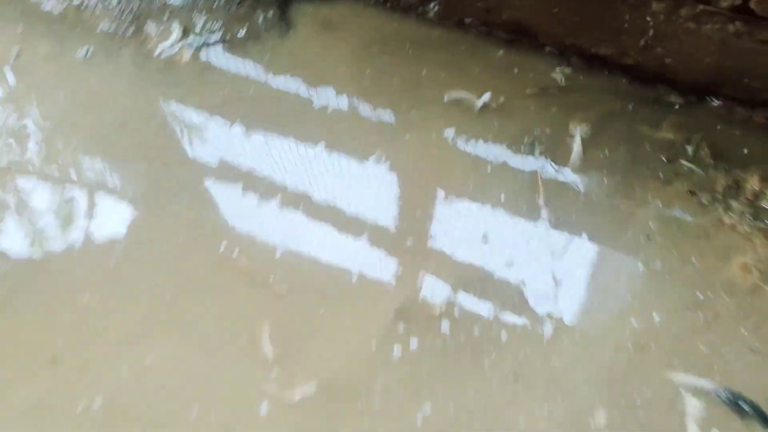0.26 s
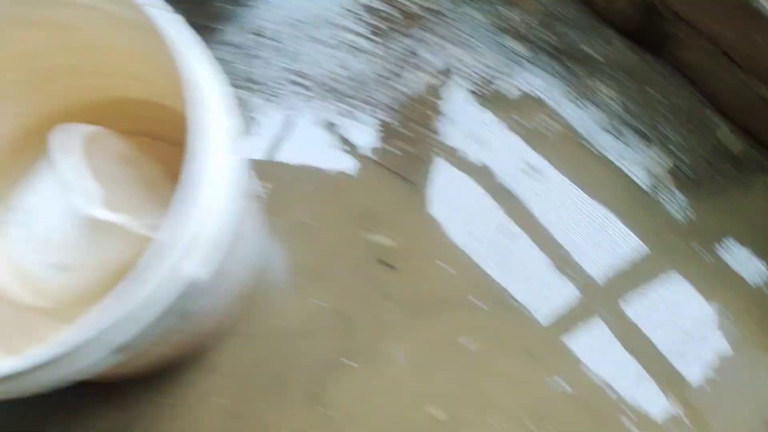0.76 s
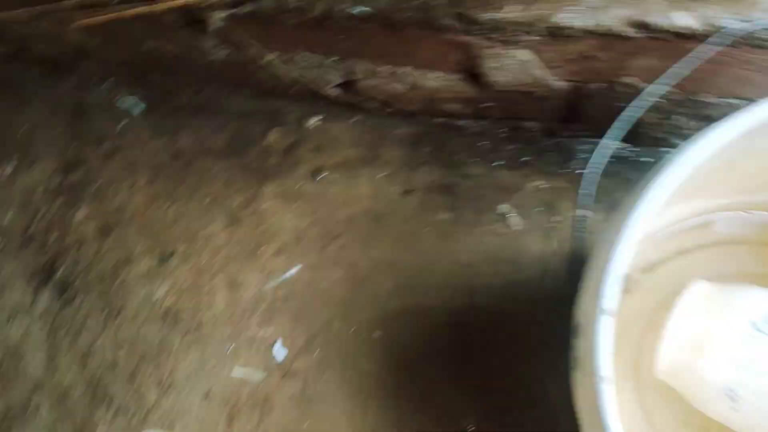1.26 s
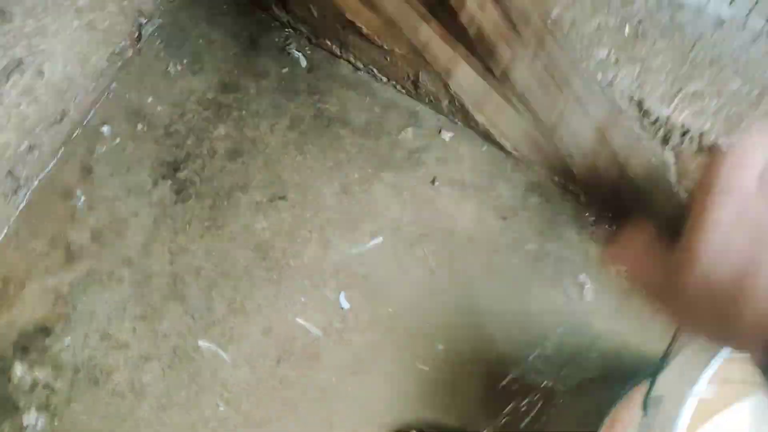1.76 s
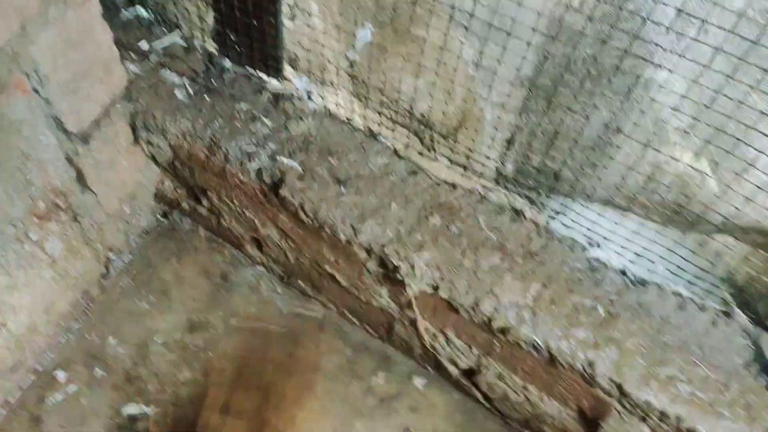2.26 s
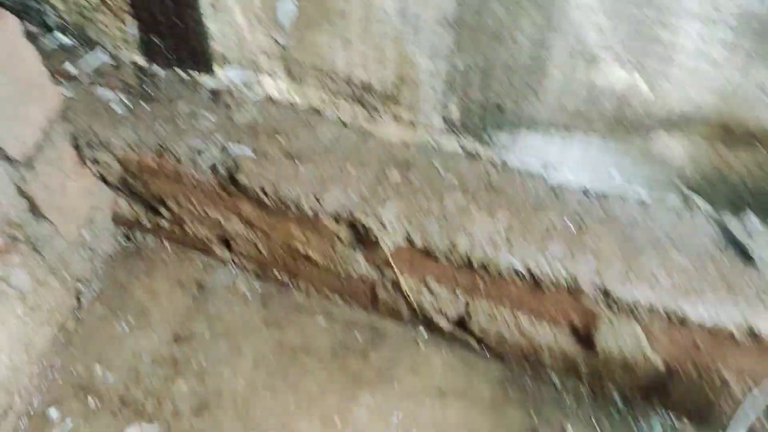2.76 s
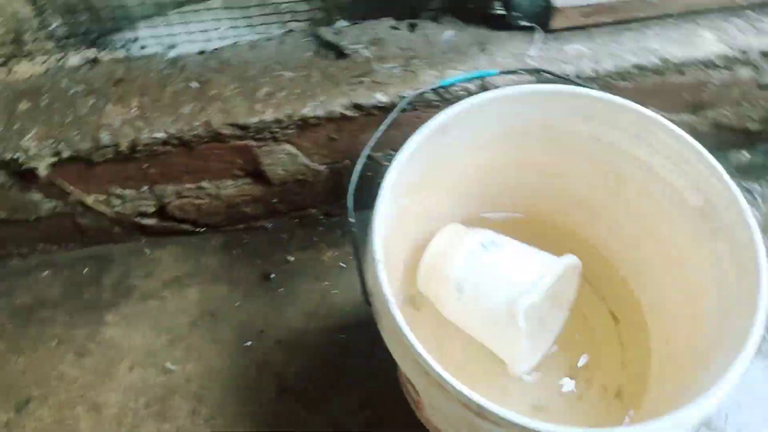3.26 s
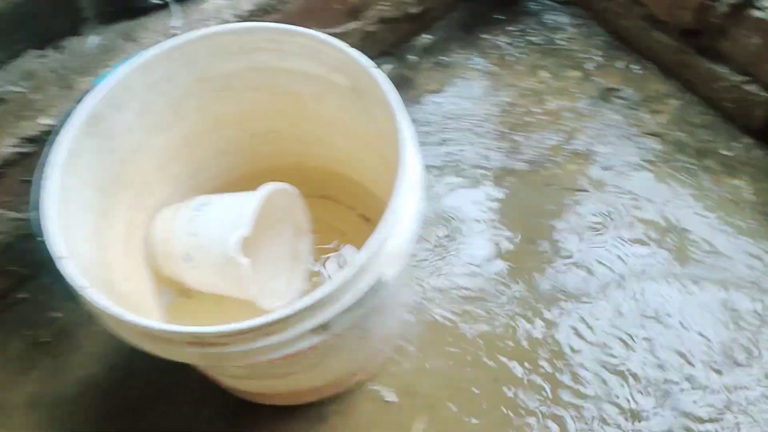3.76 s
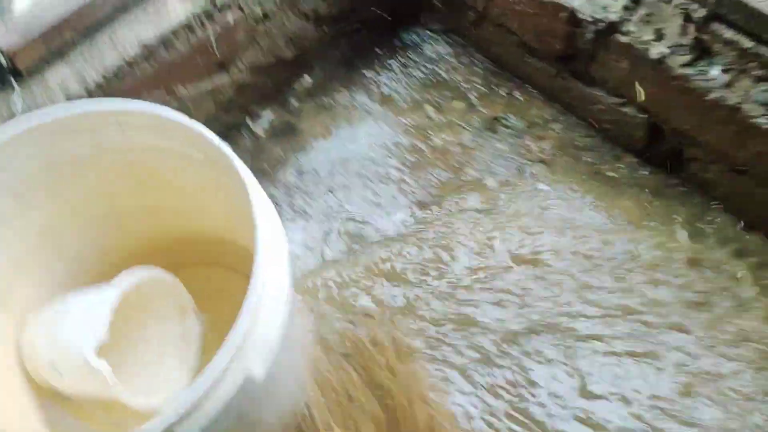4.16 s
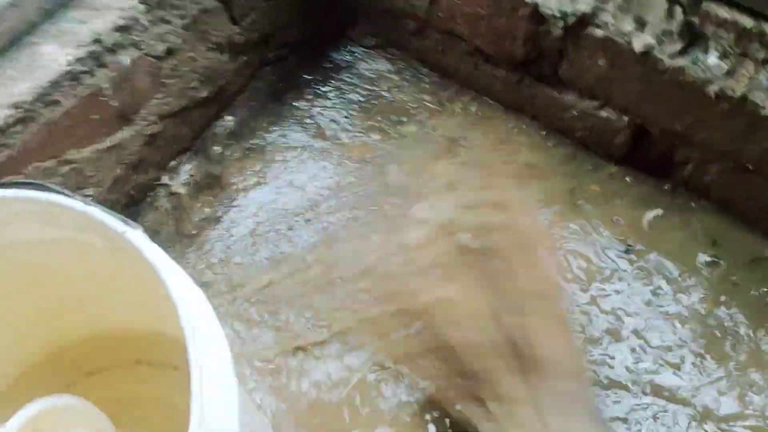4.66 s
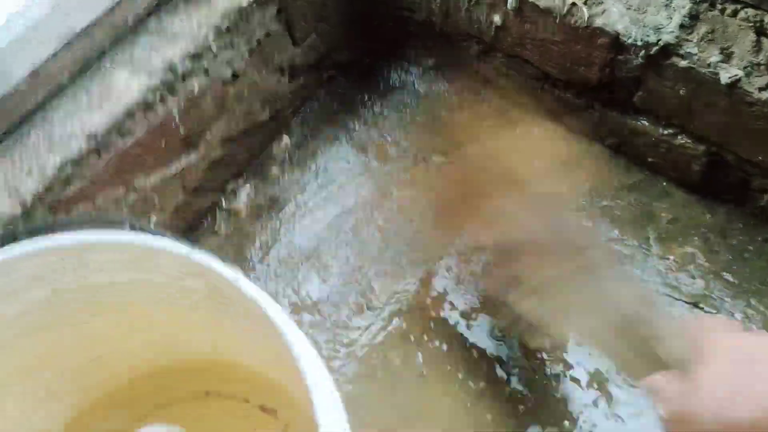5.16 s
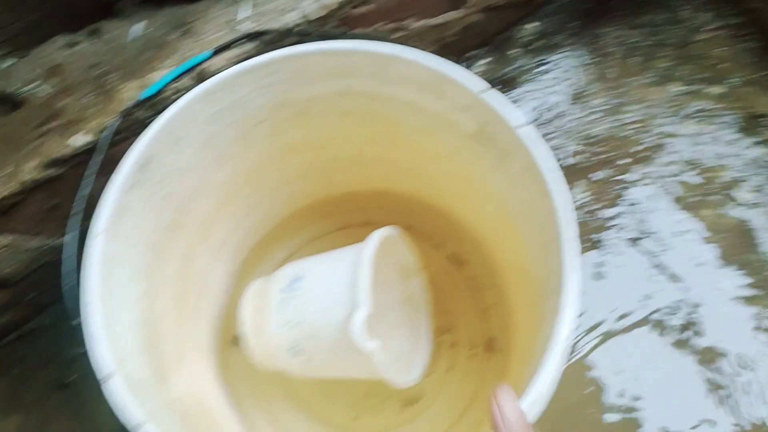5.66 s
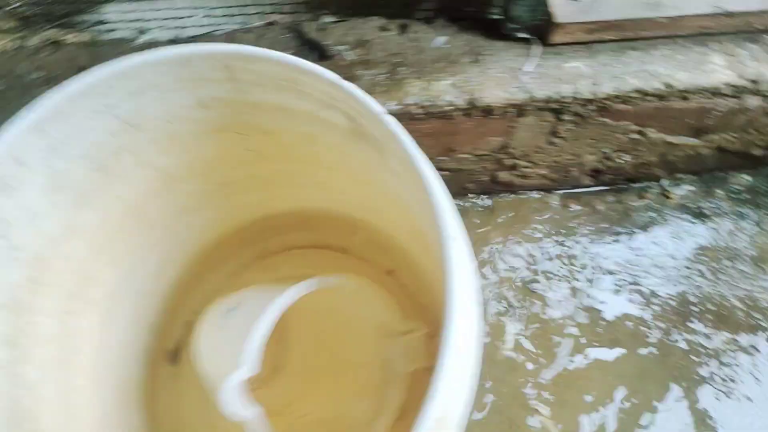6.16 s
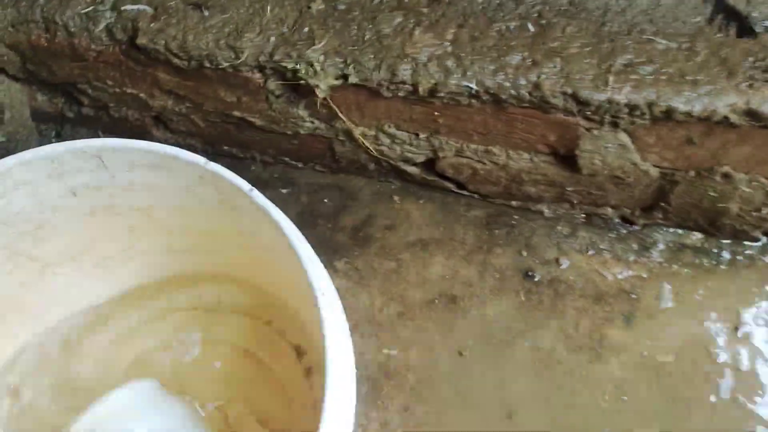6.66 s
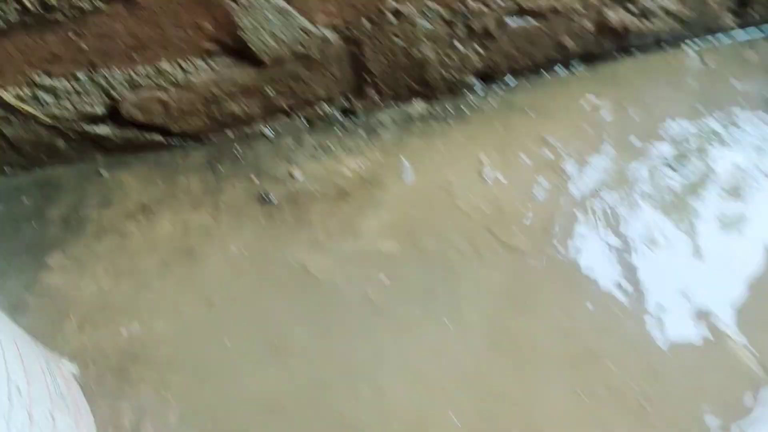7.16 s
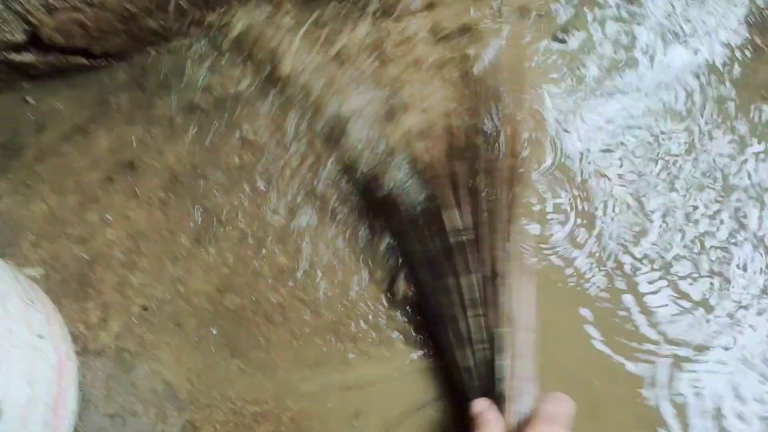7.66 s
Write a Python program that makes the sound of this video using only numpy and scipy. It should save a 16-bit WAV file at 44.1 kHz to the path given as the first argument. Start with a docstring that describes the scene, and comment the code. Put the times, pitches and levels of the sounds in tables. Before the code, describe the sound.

In a small shed, a few faint drops plink before a stiff straw broom starts scrubbing water over concrete in brisk strokes, each a hiss of straws with a slosh, with small splashes between. The sweeping pauses and a plastic bucket is dragged aside, knocking hollowly while a cup clacks inside. One more wet stroke follows. The microphone is close, with little echo.

```python
"""A small shed: a stiff straw broom scrubs muddy water over concrete. Straws hiss, water sloshes.
Between strokes, drops plink as trapped bubbles ring, and soft low bumps sound. Then a plastic bucket
is dragged aside: its base scrapes, knocks ring its wall, a cup clacks inside.
A phone close by limits the peaks and suppresses noise, leaving faint streaks in the strokes' tails."""
import sys
import numpy as np
from scipy import signal
from scipy.fft import rfft, irfft, next_fast_len
from scipy.io import wavfile
from scipy.ndimage import uniform_filter1d, minimum_filter1d, map_coordinates

SR = 44100
rng = np.random.default_rng(int(sys.argv[2]) if len(sys.argv) > 2 else 0)


def file_out(sig):
    """Save sig as 16-bit WAV at sys.argv[1]."""
    # one column per channel
    cols = np.atleast_2d(sig).T
    # limit, then scale
    lim = np.clip(cols, -1, 1)
    pcm = np.round(lim * 32767).astype(np.int16)
    wavfile.write(sys.argv[1], SR, pcm)


N = 349272

# Table levels are relative within each layer.
# background spectrum (frequency [Hz], level [dB])
BACKGROUND_SPECTRUM = [(15, -43.5), (25, -1), (80, 2), (219, 0), (286, 5.5), (476, -4), (1010, -1.5),
                       (1120, -4), (1730, 0), (5060, -14.5), (6460, -9), (8440, -27.5), (11000, -53.5),
                       (18600, -120)]
# falling drops (time [s], level [dB], pitch [Hz], spatter width [share of pitch])
DROP_HITS = [(0.068, -48.5, 6330, 0.015), (0.175, -47.5, 6290, 0.017), (0.231, -48, 4430, 0.052),
             (0.281, -52.5, 6270, .02), (0.407, -39, 2940, 0.3), (0.854, -47.5, 667, 0.1),
             (0.946, -33.5, 3070, 0.11), (0.965, -32, 1457, 0.059), (.982, -39, 1840, 0.1),
             (1.066, -36, 2900, 0.11), (1.127, -42.5, 1510, 0.1), (1.282, -46.5, 1760, 0.056),
             (1.465, -47, 813, 0.063), (1.512, -35.5, 2820, 0.1), (1.515, -39, 2000, 0.064),
             (1.6102, -39.5, 6470, 0.066), (1.61, -50.5, 3800, .05), (2.037, -38, 1460, 0.077),
             (2.038, -41.5, 3820, 0.047), (2.051, -43, 2820, 0.022), (2.1, -45, 2800, 0.024),
             (2.188, -38, 3980, 0.065), (2.49, -15.5, 1930, 0.1), (2.61, -28, 1740, 0.058),
             (2.612, -28.5, 2820, .08), (2.694, -37, 1850, 0.073), (2.703, -35, 2780, 0.047),
             (3.175, -49.5, 3813, 0.064), (3.199, -39.5, 2100, 0.037), (3.693, -30, 1830, 0.23),
             (4.273, -17.5, 1516, 0.096), (4.984, -25.5, 1060, 0.18), (5.033, -27, 1930, 0.12),
             (5.153, -12, 1570, 0.16), (5.187, -11.5, 1580, 0.16), (5.887, -46, 747, 0.26),
             (7.169, -44, 1082, 0.077)]
# low bumps (time [s], level [dB], pitch [Hz])
BUMP_HITS = [(0.726, -46.5, 283), (1.12, -49, 176.8), (1.393, -46.5, 297), (1.47, -48.5, 116.5),
             (1.897, -48.5, 333), (2.93, -48.5, 240), (3.656, -52, 369), (4.296, -41.5, 327),
             (4.722, -39.5, 332), (5.18, -39.5, 340), (5.46, -49.5, 353), (5.714, -45.5, 303),
             (7.18, -45.5, 138.3)]
# broom strokes (time [s], push [s], hold [s], touch [dB], hiss [dB], slosh [dB], sag over hold [dB])
BROOM_STROKES = [(1.001, 0.018, 0.055, -53.5, -52.5, -58.5, 5.5),
                 (1.068, 0.0043, 0.073, -68, -58, -59.5, 11), (1.633, 0.013, 0.032, -67.5, -59, -55.5, 2),
                 (1.826, 0.0074, 0.26, -52.5, -41.5, -42.5, 28),
                 (2.217, 0.008, 0.31, -59, -50, -62.5, 19.5), (2.303, 0.21, 0.11, -44.5, -21.5, -28, 13),
                 (2.804, 0.14, 0.082, -41.5, -13, -14.5, 9), (3.313, 0.12, .12, -45.5, -12.5, -17, 9),
                 (3.875, 0.12, 0.15, -43, -12.5, -16, 11), (4.288, 0.13, 0.063, -41.5, -23, -28, -1.5),
                 (4.698, 0.15, 0.098, -47, -14.5, -13, 8.5), (5.167, 0.036, 0.024, -40.5, -33.5, -35, -0.5),
                 (5.258, 0.054, 0.15, -33, -24.5, -29, 18.5), (5.427, 0.094, 0.13, -56, -37.5, -58.5, 16.5),
                 (5.705, 0.03, 0.02, -50.5, -30, -36, 2), (7.168, .006, 0.053, -64, -54.5, -73, 17.5),
                 (7.277, 0.15, 0.11, -64.5, -53.5, -56, 19), (7.622, 0.094, 0.0052, -61.5, -31, -42.5, 5.5),
                 (7.702, 0.02, 0.17, -43, -16, -10.5, 8)]
# straw tips slapping or flicking water (time [s], level [dB], treble [dB], body [dB])
TIP_SLAPS = [(1.822, -37.5, 0, 8.5), (1.939, -17.5, -20, -37), (2.1846, -39.5, 13, -35),
             (2.6322, -25.5, -8, -43.5), (2.6922, -25, -12.5, -31), (4.273, -22, -12.5, 1),
             (4.6944, -9.5, -19.5, -10), (5.15, -1, -16.5, -13.5), (5.2032, -18, -8.5, -14),
             (7.6435, -13, -9.5, -8)]
# straw, slosh, suppression residue and splat spectra (frequency [Hz], level [dB])
STRAW_SPECTRUM = [(2060, -41), (3500, -1), (4790, -8.5), (5210, -5.5), (6150, 1), (6740, 3.5), (7670, -2),
                  (8440, -28.5), (11000, -66), (18600, -120)]
SLOSH_SPECTRUM = [(88, -73), (150, -56.5), (344, -33), (605, -30.5), (780, -20.5), (1080, -16.5),
                  (1710, -4.5), (1980, -3), (2200, -1.5), (5200, -14), (6760, -53), (11400, -120)]
STREAK_SPECTRUM = [(500, -42), (1100, -10), (2600, -3.5), (5000, -10), (8000, -12.5)]
SPLAT_SPECTRUM = [(150, -38.5), (300, -21.5), (800, 2.5), (1500, 1.5), (2600, -22)]
# scrape of the bucket base (time [s], level [dB])
DRAG_ENVELOPE = [(5.99, -59.5), (6.13, -40.5), (6.2, -49.5), (6.488, -60.5), (6.866, -41), (7.016, -53),
                 (7.264, -69), (7.62, -52.5)]
# bucket scrape and rattle spectrum (frequency [Hz], level [dB])
SCRAPE_SPECTRUM = [(35, -70), (60, -17.5), (314, -4), (456, -10), (781, -7), (1130, -9), (2700, -8.5),
                   (5700, -22.5), (6860, -15), (8440, -47.5), (11000, -81.5), (18600, -120)]
# blows on the bucket (time [s], level [dB], bass [dB], treble [dB], t60 [s], struck spot's pitch [Hz])
BUCKET_KNOCKS = [(6.003, -35.5, -18.5, -25, 0.13, 1180), (6.022, -25, -9, -24, 0.08, 620),
                 (6.044, -9.5, -31, -17, 0.1, 1600), (6.062, -3.5, -19, -14.5, 0.042, 900),
                 (6.119, -28.5, -8.5, -37, 0.33, 795), (6.155, -16, -42, -12.5, 0.058, 810),
                 (6.261, -10, -30, -8.5, 0.18, 830), (6.276, -5, -11.5, -8, 0.069, 2420),
                 (6.493, -5, -9, -17.5, 0.066, 714), (6.578, -18.5, -2, -34, 0.067, 570),
                 (6.703, -9, 7, -7, 0.072, 867), (6.714, -12.5, 10.5, -15.5, 0.07, 498),
                 (6.781, -14.5, -6.5, -21, 0.058, 906), (6.936, -14.5, -2.5, -11.5, 0.069, 520),
                 (7.025, -30.5, -6, -20.5, 0.042, 707), (7.237, -17, -5.5, -26.5, 0.063, 910),
                 (7.452, -44, 15, 10, 0.14, 406), (7.555, -32.5, -6.5, -16, 0.16, 766)]
# cup against bucket wall (time [s], level [dB], brightness [dB], struck spot's pitch [Hz])
CUP_CLACKS = [(6.2622, -9.5, -3.5, 2135), (6.6501, -24.5, 0.5, 2890), (6.7895, -3, 1.5, 1930),
              (6.8488, -8.5, -11.5, 2240), (6.8654, -25.5, 7.5, 2110), (6.9042, -16, -12.5, 2840),
              (6.9152, -15, -11, 2280), (6.9421, -16.5, -15, 3340), (6.955, -29.5, -39, 3670),
              (6.9716, -18, -2, 2180), (6.9955, -23.5, -8.5, 2130), (7.0005, -19.5, -4.5, 2265),
              (7.309, -26, -12, 4580), (7.3163, -20.5, -20, 2930), (7.3695, -25.5, -26, 3600),
              (7.469, -28.5, -17, 2860)]
# bucket and cup modes (frequency [Hz], level [dB], t60 [s])
BUCKET_MODES = [(230.6, -4, 0.15), (321.6, 3.5, 0.15), (467, 0, 0.1), (569.4, 1, 0.11), (745, 0, 0.041),
                (794, -1, 0.079), (885, 0, 0.13), (1176, -4.5, 0.16), (1574, -5, 0.057), (2200, 6, 0.047),
                (2980, 5, 0.077)]
CUP_MODES = [(1540, 2, 0.03), (2230, -3, 0.03), (2900, 0, 0.025), (3700, 1, 0.022), (4350, -1, 0.018),
             (7000, 4, 0.012)]
# shed reverberation (frequency [Hz], t60 [s])
SHED_DECAY = [(200, 0.37), (1400, 0.29), (7000, 0.12)]


def amp(db):
    return 10 ** (np.asarray(db) / 20)


def unit_rms(x):
    return x / np.sqrt(np.mean(x ** 2) + 1e-20)


def log_interp(points, hz):
    knots_hz, values = np.transpose(points)
    return np.interp(np.log(hz + 1), np.log(knots_hz + 1), values)


def filtered(x, response):
    size = next_fast_len(len(x) + 4096)
    return irfft(rfft(x, size) * response(np.fft.rfftfreq(size, 1 / SR)), size)[:len(x)]


def shaped(x, spectrum):
    """Filter by (frequency [Hz], level [dB]) points."""
    return filtered(x, lambda hz: amp(log_interp(spectrum, hz)))


def wobble(rate_hz):
    """Smooth random curve."""
    knots = rng.standard_normal(int(N * rate_hz / SR) + 4)
    return map_coordinates(knots, [np.arange(N) * rate_hz / SR])


def patchy(depth_db, samples=N):
    """White noise with gain streaks, a few hundred Hz by a few tens of ms."""
    spectra = signal.stft(rng.standard_normal(samples + 512), nperseg=256)[2]
    streaks = uniform_filter1d(rng.standard_normal(spectra.shape), size=2, axis=0)
    streaks = unit_rms(uniform_filter1d(streaks, size=14, axis=1))
    return unit_rms(signal.istft(spectra * amp(depth_db * streaks), nperseg=256)[1][:samples])


def grains(low_hz, high_hz, decay_cycles, spread_db, count, samples):
    """Tiny damped sines at random times, all pitches equally strong on average."""
    when, pitch, strength = rng.random((count, 3)).T
    hz = low_hz + (high_hz - low_hz) * pitch
    k = np.arange(samples)
    cycles = hz[:, None] * k / SR
    env = np.exp(-cycles / decay_cycles) * (1 - np.exp(-cycles)) * np.cos(np.pi / 2 * k / samples)
    gain = amp(spread_db * strength ** 2) * np.sqrt(hz)
    waves = gain[:, None] * env * np.sin(2 * np.pi * cycles)
    indices = (when * N).astype(int)[:, None] + k
    return unit_rms(np.bincount(indices.ravel(), waves.ravel(), N + samples)[:N])


def add(track, start_s, sound):
    i = round(start_s * SR)
    track[i:i + len(sound)] += sound[:N - i]


def hit_time():
    return np.arange(SR // 3) / SR


def fade(t60_s, rise_s):
    t = hit_time()
    return amp(-60 * t / max(t60_s, 0.004)) * (1 - np.exp(-t / rise_s))


def background(level_db=-58.5):
    """Faint even rumble under a streaky hiss."""
    lowpass = lambda hz: 1 / (1 + (hz / 300) ** 4)
    hiss = filtered(patchy(3.78), lambda hz: 1 - lowpass(hz))
    rumble = filtered(rng.standard_normal(N), lowpass)
    return amp(level_db + 0.28 * wobble(2.6)) * unit_rms(shaped(hiss + rumble, BACKGROUND_SPECTRUM))


def drops():
    """Each drop ticks and traps a bubble that rings upward in a spatter; narrower lasts longer."""
    t, out = hit_time(), np.zeros(N)
    murmur = amp(-17) * fade(0.3, 0.01)
    for start_s, db, hz, width in DROP_HITS:
        narrowness = 0.08 / width
        env = fade(0.11 * narrowness ** 0.45, 0.0015) + murmur
        bubble = min(narrowness, 1) * np.sin(2 * np.pi * hz * t * (1 + 3 * t)) * amp(-1300 * t)
        band = lambda f, centre, span: np.exp(-((f - centre * hz) / (span * width * hz)) ** 2)
        spatter = filtered(patchy(4.5, len(t)), lambda f: band(f, 0.999, 0.95) + 0.06 * band(f, 1, 3))
        plink = env * (0.41 * bubble + 0.5 * unit_rms(spatter))
        tick = unit_rms(filtered(rng.standard_normal(len(t)), lambda f: band(f, 1.2, 2.7)))
        add(out, start_s, amp(db - 2) * (plink + 0.28 * fade(0.017, 0.00072) * tick))
    return out


def bumps():
    """Soft, dull pushes with a narrow, noisy ring."""
    out = np.zeros(N)
    env = fade(t60_s=0.23, rise_s=0.016)
    for start_s, db, hz in BUMP_HITS:
        resonance = lambda f: 1 / (1 + ((f - hz) / (0.18 * hz)) ** 2)
        body = unit_rms(filtered(rng.standard_normal(len(env)), resonance))
        add(out, start_s, amp(db) * env * body)
    return out


def stroke_envelopes(land_db_per_s=1196.5, heap_db_per_s=53, dry_db_per_s2=199):
    """The broom lands, pushes, sags and lifts; water drains. Gives two gains and progress, 0 to 1."""
    t = np.arange(N) / SR
    hiss, slosh, progress = np.zeros((3, N))
    for start_s, push_s, hold_s, touch_db, hiss_db, slosh_db, sag_db in BROOM_STROKES:
        age_s, length_s = t - start_s, push_s + hold_s
        lifted_s = np.maximum(age_s - length_s, 0)

        def envelope(top_db, fall_db, lift_db_per_s, drain_db, drain_db_per_s):
            levels_db = [touch_db - land_db_per_s, touch_db, top_db, top_db - fall_db]
            pressed = amp(np.interp(age_s, [-1, 0, push_s, length_s], levels_db))
            runoff = amp(drain_db - drain_db_per_s * lifted_s - dry_db_per_s2 * lifted_s ** 2)
            return pressed * (amp(-lift_db_per_s * lifted_s) + runoff)

        slosh_sag_db = max(sag_db - heap_db_per_s * hold_s, 0)  # water heaps up before the straws
        hiss += envelope(hiss_db, sag_db, lift_db_per_s=649, drain_db=-12.5, drain_db_per_s=80.5)
        slosh += envelope(slosh_db, slosh_sag_db, lift_db_per_s=646, drain_db=-9, drain_db_per_s=138.5)
        progress = np.where(age_s > -0.02, np.clip(age_s / length_s, 0, 1), progress)
    return hiss, slosh, progress


def wet_resonance(x, progress, start_hz=3700, end_hz=1750, boost_db=4.5, log_width=0.25):
    """A resonance in the slosh slides down through each stroke."""
    hz, t, spectra = signal.stft(x, SR, nperseg=512)
    centre_hz = start_hz * (end_hz / start_hz) ** (np.interp(t * SR, np.arange(N), progress) ** 2)
    colour_db = boost_db * np.exp(-(np.log((hz[:, None] + 1) / centre_hz) / log_width) ** 2)
    return unit_rms(signal.istft(spectra * amp(colour_db), SR, nperseg=512)[1][:N])


def broom(split_hz=2430, hiss_share=0.78):
    """Straw tips slap and chatter over grit; pushed water bursts into bubbles.
    Faint warbling streaks in the tails mimic noise-suppression residue."""
    hiss_gain, slosh_gain, progress = stroke_envelopes()
    streak_gain = amp(-20) * slosh_gain ** 0.73  # outlasts the push
    splat_gain = np.zeros(N)
    for start_s, db, treble_db, body_db in TIP_SLAPS:
        burst = amp(db - 12) * fade(0.084, 0.00024)
        add(slosh_gain, start_s, burst)
        add(hiss_gain, start_s, amp(treble_db) * burst)
        add(splat_gain, start_s, amp(db + body_db - 17) * fade(0.49, 0.019))
    chatter = patchy(4.5) + 0.63 * grains(3500, 7650, 5.3, spread_db=5.2, count=30000, samples=48)
    bubbles = patchy(2.8) + 0.22 * grains(500, 5200, 24, spread_db=5.5, count=14000, samples=220)
    warble = patchy(10) + 1.7 * grains(700, 4500, 33, spread_db=23, count=2500, samples=900)
    catch_db = 2.13 * wobble(45)  # the bundle catches and slips
    hiss = amp(catch_db - 2.5) * hiss_gain * unit_rms(shaped(chatter, STRAW_SPECTRUM))
    tail_streaks = streak_gain * unit_rms(shaped(warble, STREAK_SPECTRUM))
    splat = splat_gain * unit_rms(shaped(patchy(4.6), SPLAT_SPECTRUM))
    water = wet_resonance(shaped(bubbles, SLOSH_SPECTRUM), progress)
    # The water's treble partly follows the hiss, so it darkens through a stroke.
    treble = filtered(water, lambda hz: 1 / (1 + (split_hz / (hz + 1)) ** 4))
    water += treble * (np.clip(hiss_gain / slosh_gain, 0.1, 10) ** hiss_share - 1)
    slosh = amp(catch_db + 0.28 * wobble(90) - 3) * slosh_gain * water
    return hiss + slosh + tail_streaks + splat


def bucket_scrape():
    """The dragged base rubs unevenly on the floor."""
    times_s, levels_db = np.transpose(DRAG_ENVELOPE)
    drag_db = np.interp(np.arange(N) / SR, times_s, levels_db, left=-200, right=-200)
    return amp(drag_db + 3.5 * wobble(35)) * unit_rms(shaped(patchy(5.1), SCRAPE_SPECTRUM))


def spot_gain(hz, spot_hz, log_width, floor):
    """The struck spot favours frequencies near its pitch."""
    return floor + np.exp(-(np.log((hz + 1) / spot_hz) / log_width) ** 2)


def plastic_ring(modes, spot_hz, detune, log_width, floor):
    """Damped modes of soft plastic; strength and tuning vary per blow."""
    t, ring = hit_time(), 0
    for hz, db, t60_s in modes:
        level_draw, pitch_draw = rng.standard_normal(2)
        env = spot_gain(hz, spot_hz, log_width, floor) * amp(db + 2.5 * level_draw - 60 * t / t60_s)
        ring += env * np.sin(2 * np.pi * hz * (1 + detune * pitch_draw) * t)
    return ring


def bucket_knocks():
    """Each blow rings the plastic wall, the hollow low modes longest."""
    t, out = hit_time(), np.zeros(N)
    for start_s, db, bass_db, treble_db, t60_s, spot_hz in BUCKET_KNOCKS:
        rattle = unit_rms(shaped(patchy(3.5, len(t)), SCRAPE_SPECTRUM))
        ring = plastic_ring(BUCKET_MODES, spot_hz, detune=0.014, log_width=0.35, floor=0.35)
        wall_eq = [(400, -16.5), (800, 6), (2200, 4.5), (3500, treble_db + 8)]
        hollow_eq = [(600, bass_db - 2), (1100, bass_db - 21)]
        wall = fade(t60_s, 0.0039) * shaped(0.7 * ring + rattle, wall_eq)
        boom = 0.73 * (1 - np.exp(-t / 0.0024)) * shaped(ring, hollow_eq)
        rumble = 0.72 * fade(4.8 * t60_s, 0.0021) * shaped(rattle, hollow_eq)
        add(out, start_s, amp(db - 7.5) * (wall + boom + rumble))
    return out


def cup():
    """Thin plastic clacks against the bucket: a snap, then a short ring."""
    t, out = hit_time(), np.zeros(N)
    snap_env = 1.1 * fade(t60_s=0.016, rise_s=0.00044)
    ring_attack = 0.6 * (1 - np.exp(-t / 0.00025))
    for start_s, db, bright_db, spot_hz in CUP_CLACKS:
        ring = plastic_ring(CUP_MODES, spot_hz, detune=0.039, log_width=0.25, floor=0.06)
        snap = filtered(rng.standard_normal(len(t)), lambda hz: spot_gain(hz, spot_hz, 0.28, 0.22))
        eq = [(900, -39.5), (1500, 1.5), (3800, 5.5), (5500, bright_db + 10.5), (8400, bright_db)]
        add(out, start_s, amp(db - 4.5) * shaped(ring_attack * ring + snap_env * snap, eq))
    return out


def shed_reverb(x, delay_samples=250):
    """Wall reflections: a noise tail whose treble dies first."""
    hz, t, spectra = signal.stft(rng.standard_normal(SR // 2), SR, nperseg=256)
    decay = amp(-60 * t / log_interp(SHED_DECAY, hz)[:, None])
    tail = signal.istft(spectra * decay, SR, nperseg=256)[1]
    return signal.fftconvolve(np.pad(x, (delay_samples, 0)), tail / np.linalg.norm(tail))[:N]


def suppress_noise(x, margin_db, depth_db, hold_per_frame):
    """Turns each band down near its own quietest level; opens fast, closes slowly."""
    spectra = signal.stft(x, nperseg=512, noverlap=384)[2]
    power = uniform_filter1d(np.abs(spectra) ** 2, size=2, axis=0)
    power = np.abs(uniform_filter1d(power, size=7, axis=1))
    noise_power = np.percentile(power, 10, axis=1)[:, None] * amp(2 * margin_db)
    gain = np.maximum(1 - noise_power / (power + 1e-20), amp(depth_db))
    release = signal.lfilter([1 - hold_per_frame], [1, -hold_per_frame], gain, axis=1)
    return signal.istft(spectra * np.maximum(gain, release), nperseg=512, noverlap=384)[1][:N]


def scene():
    """Drops, bucket, cup and broom with reverb, over bumps and background; mono."""
    objects = drops() + bucket_scrape() + bucket_knocks() + cup()
    sweep = broom()
    near = sweep + objects + amp(-17.5) * shed_reverb(objects) + amp(-18) * shed_reverb(sweep)
    near = filtered(near, lambda hz: 1 / (1 + (95 / (hz + 1)) ** 4))  # the phone's microphone cuts the deep bass
    return (near + bumps() + background())[None]


def record(dry):
    """Phone: noise suppression, fast peak limiter, roll-off into the band limit."""
    ceiling, rolloff_hz, top_hz = 0.62, 8350, 8590
    clean = suppress_noise(dry[0], margin_db=5.5, depth_db=-13, hold_per_frame=0.81)
    peak_gain = np.minimum(1, ceiling / (np.abs(clean) + 1e-9))
    limited = clean * uniform_filter1d(minimum_filter1d(peak_gain, size=401), size=201)
    band_limit = lambda hz: amp(log_interp([(rolloff_hz, 0), (top_hz, -14)], hz)) * (hz < top_hz)
    return filtered(limited, band_limit)[None]


dry = scene()
out = record(dry)
file_out(out)
```